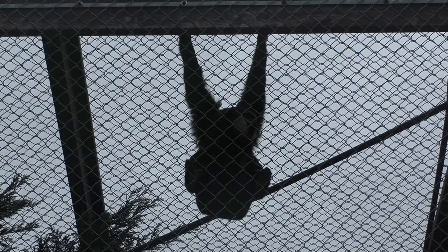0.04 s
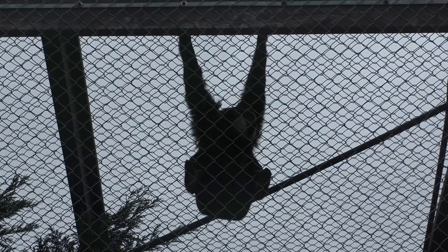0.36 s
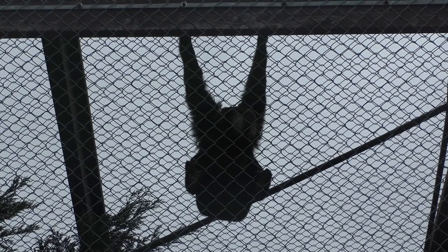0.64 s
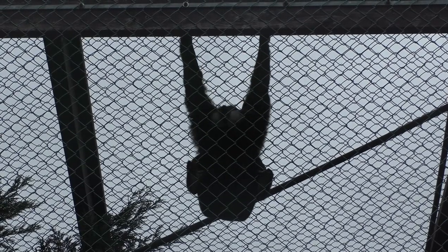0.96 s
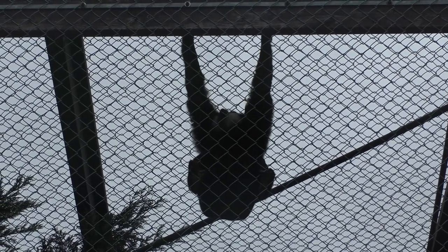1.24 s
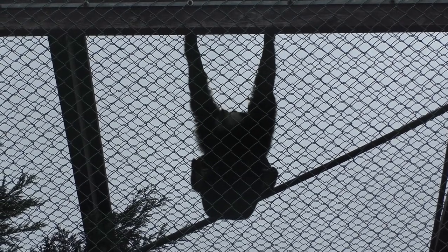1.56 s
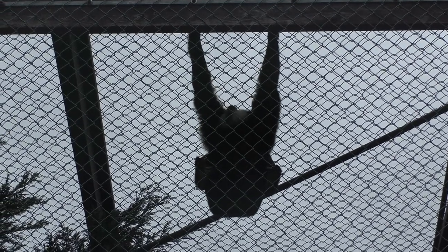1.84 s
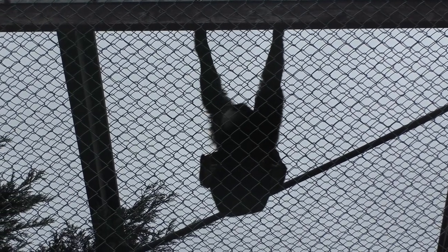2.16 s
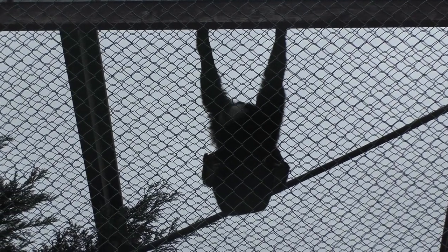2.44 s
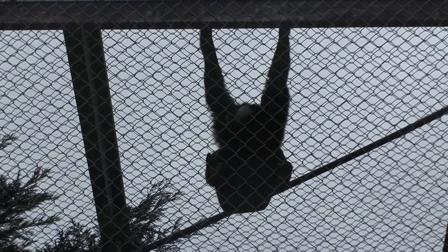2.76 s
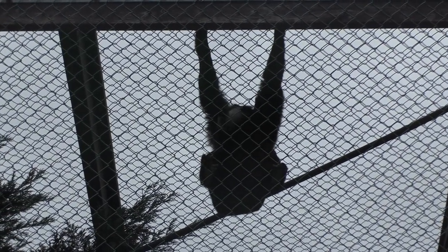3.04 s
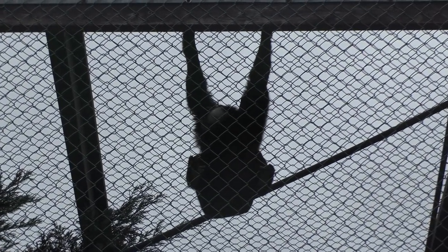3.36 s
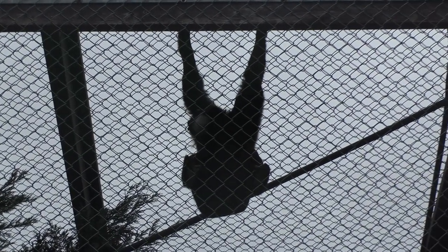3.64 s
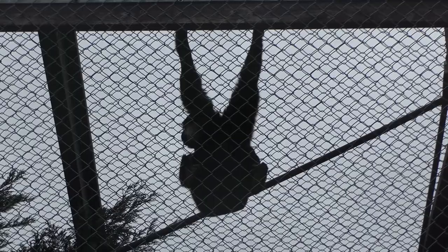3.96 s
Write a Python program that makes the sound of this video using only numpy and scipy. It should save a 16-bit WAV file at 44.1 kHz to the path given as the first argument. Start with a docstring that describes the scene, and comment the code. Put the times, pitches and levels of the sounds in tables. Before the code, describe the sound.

A gibbon gives three quick rising whoops, then arching yelps, longer climbing wails and three more whoops. The clear calls come from straight ahead, echoing briefly in an outdoor enclosure over faint hum, rumble and thin bird whistles.

```python
"""Rising whoops, arching yelps and long wails of a gibbon-like ape, echoing in a hard-walled enclosure.
The voice is a nearly pure tone with a ladder of weak overtones, coloured by throat and mouth.
Behind it: thin bird whistles, a low rumble, machine hum and outdoor noise. Hum, outdoor noise and
echo tails swell around the first three whoops, then stay low."""
import sys
import numpy as np
from scipy import signal
from scipy.fft import rfft, irfft, next_fast_len
from scipy.io import wavfile
from scipy.ndimage import uniform_filter1d, map_coordinates

SR = 44100
rng = np.random.default_rng(int(sys.argv[2]) if len(sys.argv) > 2 else 0)


def put_to_file(sound):
    """Save the sound as 16-bit audio at rate SR, in the file named by the first command-line argument."""
    columns = np.atleast_2d(sound).T  # one column per channel
    safe = np.clip(columns, -1, 1)
    whole_steps = np.round(safe * 32767)
    wavfile.write(sys.argv[1], SR, whole_steps.astype(np.int16))


N = 176400

# Call contours, one list per call. Each row: time in seconds, pitch in Hz, then levels in dB
# (before trims) of the fundamental, second harmonic, middle overtones and treble overtones.
WHOOP_CALLS = [
    [(0.186, 442, -17, -63, -47.5, -52.5), (0.206, 459.6, -14.5, -61, -58.5, -61.5),
     (0.236, 511, -20, -52, -49.5, -57), (0.28, 736, -24.5, -49, -61, -54.5),
     (0.308, 819, -20.5, -46.5, -54.5, -52), (0.322, 776, -41, -44.5, -53, -62.5)],
    [(0.592, 452, -13.5, -46, -51.5, -56.5), (0.622, 497.6, -17.5, -52, -53, -56.5),
     (0.658, 666, -26, -47, -62, -56.5), (0.684, 819.4, -19.5, -45, -49.5, -56.5),
     (0.708, 853, -28, -39.0, -51.5, -50.5), (0.72, 828, -40, -43.5, -51.5, -58)],
    [(0.876, 503.7, -17, -32.5, -51, -50.5), (0.908, 604, -19.5, -54, -47.5, -51.5),
     (0.922, 698, -27.0, -46, -63.5, -61), (0.936, 772, -20, -35.5, -43, -57),
     (0.952, 840, -22, -43, -58.5, -55.5), (0.982, 840, -31, -40, -50.5, -61.5)],
    [(1.203, 632, -24.5, -42, -62, -66.5), (1.233, 691, -19, -43.5, -43, -53),
     (1.267, 785.6, -21, -28, -51, -57.5), (1.325, 793, -21.5, -29.5, -49.5, -59.0),
     (1.335, 809, -31, -43.5, -64.5, -62.5)],
    [(3.135, 777, -30, -37, -66, -59), (3.155, 906, -27.5, -34.5, -39.5, -55.0),
     (3.181, 971.5, -19.5, -48, -58, -60.5), (3.225, 957, -24.5, -37.5, -53, -67.5),
     (3.237, 932, -34.5, -32.5, -62.5, -72)],
    [(3.362, 583, -41.5, -70, -64, -68.5), (3.39, 611, -28.5, -47, -63, -66),
     (3.432, 880, -26, -32.5, -43.5, -51), (3.462, 975.4, -22, -46.5, -53, -63.5),
     (3.498, 949, -25, -32, -53, -68), (3.508, 920, -49, -35, -57, -75.5)],
    [(3.697, 536, -42, -63, -70, -81), (3.727, 589, -28.5, -50, -55.5, -59.5),
     (3.765, 851, -27, -31.5, -49.0, -59), (3.789, 948, -20.5, -44.5, -46.5, -57.5),
     (3.805, 1176, -30.5, -49, -62, -60), (3.835, 930, -28.5, -35, -48.5, -61.0)],
]
YELP_CALLS = [
    [(1.04, 911, -23.5, -27, -34.5, -44), (1.09, 945.3, -22, -23.5, -47, -62.5),
     (1.12, 897.6, -24, -40.5, -53, -69), (1.14, 868, -36, -31, -49, -67),
     (1.16, 813, -22.0, -29.5, -50.5, -65.5), (1.172, 727, -35, -49, -61, -65)],
    [(1.376, 980, -20.5, -29, -55, -50), (1.4, 1025, -20.5, -27.5, -51.5, -44),
     (1.47, 995, -25.5, -29.5, -48.5, -43.5), (1.52, 965.5, -15, -35.5, -55.5, -61),
     (1.55, 866, -36, -37, -51.5, -66.5), (1.58, 786, -25, -37, -62, -65)],
    [(2.131, 1064, -23.5, -23.5, -51, -48.5), (2.161, 925.4, -24.0, -25, -43.5, -55.5),
     (2.185, 890, -38, -40.5, -51.5, -62.5), (2.209, 811, -37, -47.5, -68, -64.5)],
]
WAIL_CALLS = [
    [(1.625, 654, -22, -42, -51, -62.5), (1.643, 653.5, -20.5, -44.0, -47, -57.5),
     (1.733, 777, -20.5, -27.5, -56, -63.5), (1.799, 892, -26, -42.5, -47, -55),
     (1.811, 911, -21, -50, -56.5, -59), (1.87, 974, -19, -58, -54, -64),
     (1.998, 1012, -28.5, -48.5, -42, -50.5), (2.034, 1030, -14, -51.5, -45, -54.5),
     (2.064, 1065, -15, -36.5, -43, -62), (2.082, 1017, -29, -31.5, -58, -64.5)],
    [(2.344,487,-33.5,-59.5,-72,-75), (2.378,499.5,-26,-52.5,-56,-64), (2.4,558,-29.5,-54.5,-64,-60),
     (2.44,789,-25,-36.5,-44,-57), (2.456,828,-23.5,-44,-55.5,-54.5), (2.494,762.5,-25.5,-29,-60.5,-62.5),
     (2.542,894,-29.5,-47.5,-42,-51), (2.577,937,-22,-41.5,-52,-61), (2.703,965.2,-19.5,-59,-49,-61.5),
     (2.728,999,-36.5,-51.5,-45,-60.5), (2.747,1015,-33.5,-33,-55.5,-63.5), (2.773,969,-34.5,-46,-62,-67)],
    [(2.794,1155,-33,-47,-59,-63), (2.808,1125,-17.5,-42,-42,-46.5), (2.834,1107,-17,-38.5,-49.5,-50.5),
     (2.958,1118,-18.5,-56.5,-46.5,-54), (2.986,1097,-17.5,-35,-40.5,-47.5),
     (3.013,1060,-22.5,-54,-54.5,-58), (3.051,1031,-26.5,-36.5,-56,-60), (3.089,928,-21.5,-41,-54,-62.5),
     (3.099,842,-44,-35.5,-49.5,-60)],
]
# Hoarse moments. Each row: centre in seconds, half length in seconds, added roughness.
HOARSE_MOMENTS = [(2.165, .03, 1), (3.8, .07, 3.6)]
# Throat and mouth resonances, normal and wide open. Each row: frequency in Hz, gain in dB.
TRACT_EQ = [(1000, -3), (1350, 0.5), (1620, 14), (1850, 8.5), (2300, 1), (3150, -4), (3600, 7),
            (4200, -0.5), (4650, -11), (5600, -0.5), (6200, -12.5), (7200, -4.5), (8300, -19.5),
            (12000, -18.5)]
OPEN_TRACT_EQ = [(3200, 3.5), (4050, -1), (4600, -9), (5500, -2.5), (8100, -8), (8900, -15), (11000, -13),
                 (15500, -40)]
# Nearby walls. Each row: delay in seconds, gain in dB, pan from -1 (right) to 1 (left).
WALL_ECHOES = [(.0034, -17.5, 0.16), (0.0128, -16.5, -0.54), (.027, -20.5, 0.26)]
# Reverb decay. Each row: frequency in Hz, time to fall 60 dB in seconds.
REVERB_T60 = [(200, 0.25), (900, 0.48), (2000, 0.46), (5000, 0.46), (12000, 0.22)]
# Reverb colour. Each row: frequency in Hz, gain in dB.
REVERB_EQ = [(700, -1), (1050, -2.5), (3000, 1)]
# Bird whistles. Each row: start in seconds, length in seconds, first and last pitch in Hz, level in dB.
WHISTLES = [(0, 0.067, 6930, 6900, -60), (0.11, 0.068, 7140, 6850, -56.5), (3.605, 0.11, 8550, 8260, -77),
            (3.952, 0.054, 8160, 6100, -74)]
# Machine tones. Each row: frequency in Hz, level in dB before the swell.
HUM_TONES = [(71, -47), (89, -49), (143, -54), (178, -51)]
# Outdoor noise and low rumble. Each row: frequency in Hz, relative spectral density in dB.
OUTDOOR_SPECTRUM = [(25, -24.5), (50, -24.5), (80, -6), (270, -5.5), (570, -12), (730, 2.5), (870, -8),
                    (1500, -8), (3200, -29), (6000, -42), (15500, -45.5)]
RUMBLE_SPECTRUM = [(25, -6), (85, 10.5), (120, -11.5), (175, -5), (900, -31.5)]
# Swell of hum, outdoor noise and echo tails. Each row: time in seconds, gain in dB.
SWELL_CURVE = [(0, 2), (0.202, 0), (0.242, -21), (.35, -18.5), (0.421, -5), (.52, -4.5), (.6, -2),
               (.65, -22.5), (.74, -20), (0.858, -1), (0.887, -8.5), (0.929, -24), (1.0, -18.5),
               (1.035, -13.5), (1.1, -19.5), (1.65, -18.5), (2.5, -21), (2.68, -25)]

REF_PITCH_HZ, REF_ATTACK_S, RELEASE_S = 762.6, 0.0055, 0.006
JITTER_RATIO, SMEAR_RAD, FLUTTER_DB = 0.002, 0.036, 4.5  # depths at roughness 1; smear per harmonic number
JITTER_HZ, SMEAR_HZ, FLUTTER_HZ = 200, 500, 65
SECOND_TRIM_DB, UPPER_TRIM_DB = 1, -1
MIDDLE_RASP_DB, TREBLE_RASP_DB = -17, -11
MIDDLE_FROM_HZ, TREBLE_FROM_HZ, TOP_HZ = 2400, 4600, 15750
OPEN_FROM_HZ, OPEN_SPAN_HZ = 960, 70
REVERB_DB, REVERB_DELAY_S, REVERB_WIDTH = -12.5, 0.014, 0.5
OUTDOOR_DB, RUMBLE_DB, AMBIENT_WIDTH = -36.5, -65.5, 0.46


def ape_call(rows):
    """One gliding call: fundamental, octave, overtones and rasp. Lower pitch is rougher."""
    knots_s, *columns = np.transpose(rows)
    attack_s = REF_ATTACK_S * (REF_PITCH_HZ / columns[0][0]) ** 2  # low calls start more softly
    first = max(0, int((knots_s[0] - attack_s / 2) * SR))
    samples = np.arange(first, min(N, int((knots_s[-1] + RELEASE_S) * SR)))
    t, n = samples / SR, len(samples)
    contours = [uniform_filter1d(np.interp(t, knots_s, column), size=400) for column in columns]
    pitch_hz, first_db, second_db, middle_db, treble_db = contours
    pitch_hz = uniform_filter1d(pitch_hz, size=500)
    gate = np.clip((t - t[0]) / attack_s, 0, 1) * np.clip((t[-1] - t) / RELEASE_S, 0, 1)
    hoarse = sum(extra * np.exp(-((t - at_s) / half_s) ** 2) for at_s, half_s, extra in HOARSE_MOMENTS)
    roughness = (REF_PITCH_HZ / pitch_hz) ** 2 + hoarse
    jitter = 1 + JITTER_RATIO * roughness * wobble(JITTER_HZ, n)
    phase = 2 * np.pi * np.cumsum(pitch_hz * jitter) / SR
    middle, treble = overtones(pitch_hz, phase, roughness)
    second_db += 0.5 * FLUTTER_DB * wobble(FLUTTER_HZ, n)
    middle += amp(MIDDLE_RASP_DB) * roughness * rasp(phase, MIDDLE_FROM_HZ, TREBLE_FROM_HZ)
    treble += amp(TREBLE_RASP_DB) * roughness * rasp(phase, TREBLE_FROM_HZ, TOP_HZ)
    voice = (amp(first_db) * np.sin(phase)
             + amp(second_db + SECOND_TRIM_DB) * np.sin(2 * phase)
             + amp(middle_db + UPPER_TRIM_DB) * middle
             + amp(treble_db + UPPER_TRIM_DB) * treble)
    return np.bincount(samples, np.sqrt(2) * gate * voice, N)


def overtones(pitch_hz, phase, roughness):
    """Wavering harmonics 3-31 in two normalised bands. The mouth opens on the highest notes."""
    n = len(phase)
    k = np.arange(3, 32)[:, None]
    hz = k * pitch_hz
    flutter = np.minimum(roughness, 2) * np.array([wobble(FLUTTER_HZ, n) for _ in k])
    opening = np.clip((pitch_hz - OPEN_FROM_HZ) / OPEN_SPAN_HZ, 0, 1)
    tract_db = (1 - opening) * log_interp(TRACT_EQ, hz) + opening * log_interp(OPEN_TRACT_EQ, hz)
    gains = amp(tract_db + FLUTTER_DB * flutter) * (hz < TOP_HZ)
    smear_rad = SMEAR_RAD * k * roughness * np.array([wobble(SMEAR_HZ, n) for _ in k])
    partials = gains * np.sin(k * phase + smear_rad)
    upper_share = np.clip((hz - MIDDLE_FROM_HZ) / pitch_hz + 0.5, 0, 1)
    treble_share = np.clip((hz - TREBLE_FROM_HZ) / pitch_hz + 0.5, 0, 1)
    middle_norm = np.sqrt(((upper_share - treble_share) * gains ** 2).sum(0))
    treble_norm = np.sqrt((treble_share * gains ** 2).sum(0))
    middle = ((1 - treble_share) * partials).sum(0) / middle_norm
    treble = (treble_share * partials).sum(0) / treble_norm
    return middle, treble


def rasp(phase, low_hz, high_hz):
    """Airy, throat-coloured noise band, pulsed once per voice cycle."""
    air = filtered(noise(TRACT_EQ, len(phase)), lambda hz: (hz > low_hz) & (hz < high_hz))
    return (1 + np.cos(phase)) / 2 * unit_rms(air)


def wall_echoes(x):
    """Weak early reflections that beat against the gliding voice."""
    return sum(amp(db) * np.array([[1 + pan], [1 - pan]]) * np.pad(x, (int(delay_s * SR), 0))[:N]
               for delay_s, db, pan in WALL_ECHOES)


def enclosure_reverb(x):
    """Diffuse echo of the walls; lows and top treble die first."""
    hz, t, spectra = signal.stft(rng.standard_normal((2, SR)), SR, nperseg=256)
    decay = amp(-60 * t / log_interp(REVERB_T60, hz)[:, None])
    tail = signal.istft(spectra * decay, SR, nperseg=256)[1]
    coloured = filtered(x, lambda f: amp(log_interp(REVERB_EQ, f)))
    late = np.pad(coloured, (int(REVERB_DELAY_S * SR), 0))
    mid, side = signal.fftconvolve(late[None], tail / np.linalg.norm(tail[0]), axes=1)[:, :N]
    return amp(REVERB_DB) * stereo(mid, REVERB_WIDTH * side)


def bird_whistles():
    """Thin, falling whistles of a small bird."""
    out = np.zeros(N)
    for start_s, length_s, first_hz, last_hz, db in WHISTLES:
        progress = np.clip((np.arange(N) / SR - start_s) / length_s, 0, 1)
        hz = (first_hz + (last_hz - first_hz) * progress) * (1 + 0.0084 * wobble(rate_hz=140, n=N))
        envelope = np.sqrt(2 * np.abs(np.sin(np.pi * progress)))
        out += amp(db) * envelope * np.sin(2 * np.pi * np.cumsum(hz) / SR)
    return out


def machine_hum():
    """Low machine tones with wandering phase."""
    t = np.arange(N) / SR
    return sum(amp(db) * np.sqrt(2) * np.sin(2 * np.pi * hz * t + 0.5 * wobble(rate_hz=7, n=N))
               for hz, db in HUM_TONES)


def ambient_noise(spectrum, db):
    """Steady, centred stereo noise: the outdoors or the low rumble."""
    return amp(db) * stereo(noise(spectrum, N), AMBIENT_WIDTH * noise(spectrum, N))


def amp(db):
    """Decibels to gain."""
    return 10 ** (np.asarray(db) / 20)


def unit_rms(x):
    """Scale to rms 1."""
    return x / np.sqrt(np.mean(x ** 2) + 1e-20)


def stereo(mid, side):
    """Mid and side to left and right."""
    return np.array([mid + side, mid - side])


def log_interp(points, hz):
    """Interpolate (Hz, value) points on a log frequency axis."""
    knots_hz, values = np.transpose(points)
    return np.interp(np.log(hz + 1), np.log(knots_hz + 1), values)


def wobble(rate_hz, n):
    """Smooth random curve, rate_hz knots a second."""
    return map_coordinates(rng.standard_normal(2048), [np.arange(n) * rate_hz / SR], mode="wrap")


def filtered(x, response):
    """Zero-phase filter with gain response(hz)."""
    n = x.shape[-1]
    size = next_fast_len(n + 8192)
    return irfft(rfft(x, size) * response(np.fft.rfftfreq(size, 1 / SR)), size)[..., :n]


def noise(spectrum, n):
    """Coloured noise of rms 1."""
    return unit_rms(filtered(rng.standard_normal(n), lambda hz: amp(log_interp(spectrum, hz))))


def scene():
    """The ape straight ahead, its echoes, and the background."""
    ape = sum(ape_call(rows) for rows in [*WHOOP_CALLS, *YELP_CALLS, *WAIL_CALLS])
    birds = bird_whistles()
    rumble = ambient_noise(RUMBLE_SPECTRUM, RUMBLE_DB)
    swell = amp(np.interp(np.arange(N) / SR, *np.transpose(SWELL_CURVE)))
    reverb = swell * enclosure_reverb(ape / swell)  # tails follow only changes in the swell
    background = swell * (machine_hum() + ambient_noise(OUTDOOR_SPECTRUM, OUTDOOR_DB))
    return ape + wall_echoes(ape) + reverb + birds + rumble + background


def record(dry):
    """Brick-wall low-pass at TOP_HZ."""
    return filtered(dry, lambda hz: hz < TOP_HZ)


dry = scene()
out = record(dry)
put_to_file(out)
```